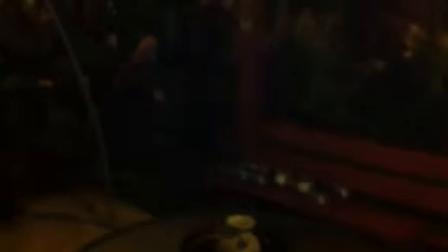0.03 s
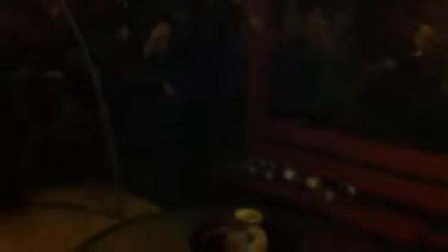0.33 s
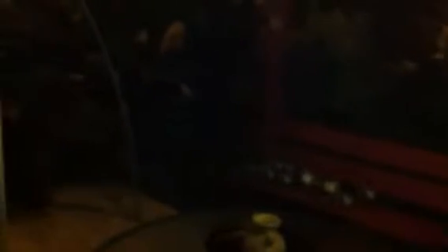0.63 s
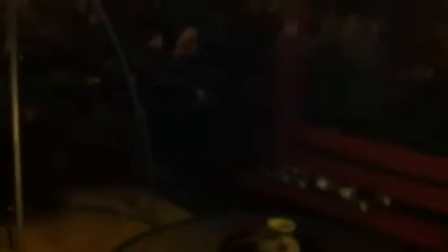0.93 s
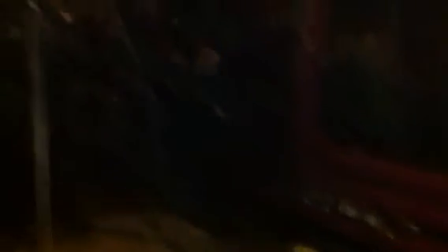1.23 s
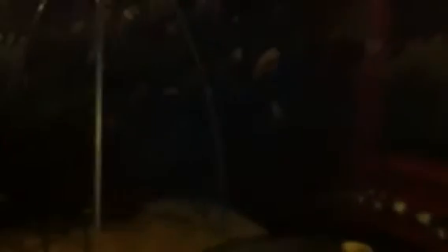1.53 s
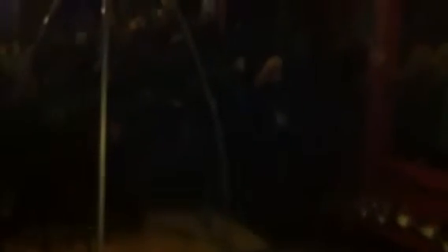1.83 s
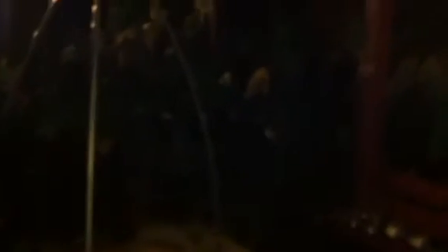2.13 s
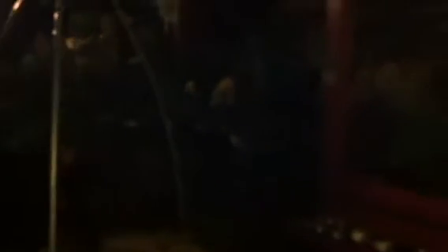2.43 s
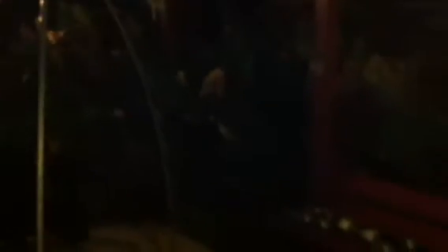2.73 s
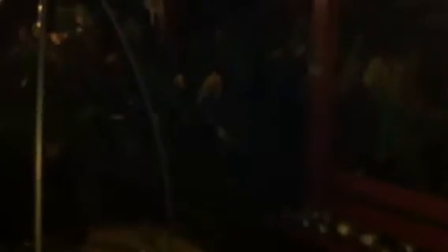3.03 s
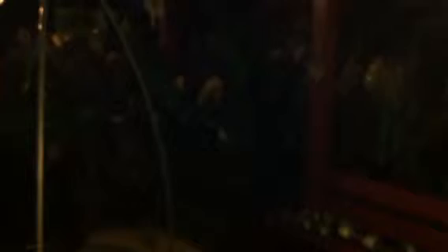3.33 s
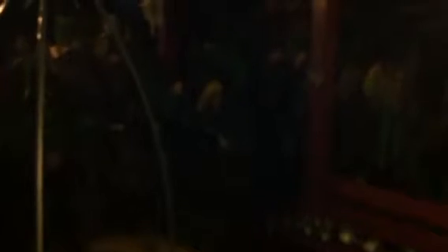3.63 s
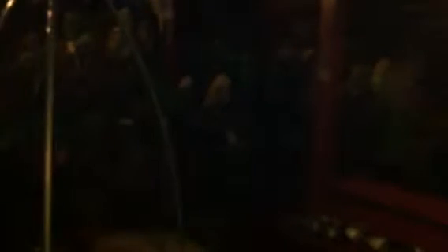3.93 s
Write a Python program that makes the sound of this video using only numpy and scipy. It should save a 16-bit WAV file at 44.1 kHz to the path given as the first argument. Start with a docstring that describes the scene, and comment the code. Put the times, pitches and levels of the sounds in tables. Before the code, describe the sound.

Distant frogs trade short whistled calls over hiss, then a near frog chirps quickly.

```python
"""Coqui frogs in a night garden

Over a steady rain-like hiss, far frogs answer one another with a low, mostly falling "co" and a
higher rising "qui", each a gliding tone radiated by the vocal sac and scattered by leaves and walls.
Late on a faint hum swells, and a near frog gives a sharp "co" and six quick "qui" notes,
reflected by the porch."""
import sys
import numpy as np
from scipy import signal
from scipy.fft import rfft, irfft
from scipy.io import wavfile
from scipy.ndimage import uniform_filter1d

SR = 44100
rng = np.random.default_rng(int(sys.argv[2]) if len(sys.argv) > 2 else 0)


def digitize_waveform(pressure):
    """Quantize a signal to 16-bit integers and store it at the path in sys.argv[1].

    Rows of a 2-D input are taken as channels; values are limited to [-1, 1].
    """
    field = np.atleast_2d(pressure).T
    bounded = np.clip(field, -1, 1)
    quanta = np.round(bounded * 32767).astype(np.int16)
    wavfile.write(sys.argv[1], SR, quanta)


N = 176400

# Relative spectral density of the hiss: frequency_hz, level_db
HISS_SPECTRUM = [(20, -20), (45, -36), (65, -28.5), (100, -18), (160, -3.5), (240, -1.5), (320, -2),
                 (500, -4), (680, 0), (1300, -0.5), (1800, -0.5), (2600, -1.95), (3200, -3), (3700, -6.5),
                 (5000, -6), (7500, -8), (11000, -7), (14500, -8), (15900, -14)]
# Slow swell of the hiss below the treble: time_s, gain_db
LOW_HISS_SWELL = [(0, -0.1), (1.5, 0.4), (2.2, 1), (3.2, 1.75), (4, 0.4)]
# Brief Gaussian surges of the treble hiss: centre_s, half_width_s, gain_db
TREBLE_SURGES = [(3.225, 0.005, 5.5), (3.538, 0.01, 2.2), (3.72, 0.034, 1)]
# Far "co" notes: start_s, length_s, source_level_db, pitch_hz, glide_fraction
FAR_CO_NOTES = [(.289, 0.031, -35.5, 2210, 0.005), (.456, 0.045, -34.5, 2060, -0.073),
                (0.842, 0.031, -40, 2050, -0.012), (1.158, 0.053, -38.5, 2247, -0.015),
                (1.542, 0.042, -32, 2078, -0.078), (1.914, 0.055, -42, 2222, -.02),
                (1.968, 0.035, -35, 1998, -0.024), (2.351, 0.064, -34, 2083, -0.073),
                (2.789, .04, -38.5, 2230, -0.016), (3.086, 0.064, -35, 2088, -0.067),
                (3.775, 0.043, -30.5, 2055, -0.081), (3.876, 0.052, -37.5, 2200, -0.029)]
# Far "qui" notes: start_s, length_s, source_level_db, pitch_hz, glide_fraction
FAR_QUI_NOTES = [(.217, 0.019, -36, 2970, 0.17), (.506, .03, -39, 3100, 0.048),
                 (0.554, 0.038, -36, 3040, 0.15), (.888, 0.025, -38.5, 3060, .11),
                 (1.549, 0.027, -37, 3100, 0.11), (1.599, 0.0385, -35, 3140, 0.061),
                 (1.647, 0.032, -34.5, 3035, 0.15), (2.059, .02, -36.5, 2980, .03),
                 (2.114, 0.029, -36, 3100, 0.12), (2.276, 0.021, -33.5, 2994, 0.026),
                 (2.385, 0.032, -36.5, 3073, 0.025), (2.452, 0.032, -32, 3026, 0.089),
                 (2.596, .04, -43, 3100, .02), (2.672, .03, -39, 3150, 0.088),
                 (2.718, 0.034, -38, 3020, .06), (3.838, 0.042, -35.5, 3086, 0.079),
                 (3.886, 0.0296, -36.5, 3130, 0.17)]
# Envelope of the hum: time_s, level_db
HUM_ENVELOPE = [(0, -71), (2.5, -64), (2.85, -56), (3.5, -57.5), (3.75, -53), (4, -56)]
# Near frog's notes: start_s, length_s, level_db, start_pitch_hz, end_pitch_hz
NEAR_CALL = [(3.0015, .02, -23.8, 2300, 2050), (3.0922, .0115, -19.3, 3080, 3150),
             (3.2060, .02, -25, 3050, 3300), (3.3212, .014, -24.5, 3050, 3280),
             (3.4362, .014, -24.6, 3050, 3280), (3.5443, .014, -26.5, 3050, 3270),
             (3.6485, .02, -29, 3040, 3300)]
# Early reflections from the porch: delay_s, gain_ratio
PORCH_REFLECTIONS = [(.0108, 0.45), (0.0164, .3), (0.0239, .25), (.0345, 0.21), (0.054, .15)]


def amp(db):
    """The decibel scale: 20 dB is a factor of ten in amplitude."""
    return 10 ** (np.asarray(db) / 20)


def unit_rms(x):
    """Normalisation to a mean power of 1."""
    return x / np.sqrt(np.mean(x ** 2) + 1e-20)


def drift(t, low_hz, high_hz):
    """Sinusoids of random phase sum to an irregular fluctuation of rms 1."""
    rates_hz = np.geomspace(low_hz, high_hz, num=30)
    return unit_rms(sum(np.sin(2 * np.pi * (hz * t + rng.random())) for hz in rates_hz))


def hiss():
    """Spectrally shaped noise: a rain-like wash whose low and treble bands flicker independently."""
    hop, crossover_hz, level_db = 256, 3540, -38.5
    frames = N // hop + 6
    t = np.arange(frames) * hop / SR
    hz = np.fft.rfftfreq(1024, 1 / SR)
    real, imag, patches = rng.standard_normal((3, frames, len(hz)))
    patches = uniform_filter1d(patches, size=10, axis=0)  # smooth in time
    patch_db = unit_rms(uniform_filter1d(patches, size=24, axis=1))  # and in frequency
    surge_db = sum(db * np.exp(-((t - centre) / width) ** 2) for centre, width, db in TREBLE_SURGES)
    treble_db = 0.75 * drift(t, 2.5, 35) + surge_db
    low_db = 0.73 * drift(t, 1.494, 20) + np.interp(t, *np.transpose(LOW_HISS_SWELL))
    treble_share = 1 / (1 + (crossover_hz / (hz + 1)) ** 8)
    gain = amp(patch_db + np.outer(treble_db, treble_share) + np.outer(low_db, 1 - treble_share))
    noise = signal.istft(((real + 1j * imag) * gain).T, nperseg=1024, noverlap=1024 - hop)[1][:N]
    knot_hz, knot_db = np.transpose(HISS_SPECTRUM)
    colour = amp(np.interp(np.log(np.fft.rfftfreq(N, 1 / SR) + 1), np.log(knot_hz), knot_db))
    return amp(level_db) * unit_rms(irfft(rfft(noise) * colour, N))


def add(mix, start_s, sound):
    """Linear superposition: a sound adds to the mix from its start time."""
    part = mix[max(round(start_s * SR), 0):][:len(sound)]
    part += sound[:len(part)]


def frog_note(length_s, from_hz, to_hz, bend, attack_s, release_s, flutter_depth):
    """Radiation from the vocal sac: a gliding tone with a slight amplitude flutter."""
    t = np.arange(0, length_s, 1 / SR)
    hz = from_hz + (to_hz - from_hz) * (t / length_s) ** bend
    gate = np.minimum(t / attack_s, 1) * np.minimum((length_s - t) / release_s, 1)
    flutter = 1 + flutter_depth * drift(t, low_hz=90, high_hz=280)
    return np.sin(np.pi / 2 * gate) * flutter * np.sin(2 * np.pi * np.cumsum(hz) / SR)


def scatter(sound, onset_s, t60_s=0.5, echoes_per_s=2000):
    """Diffuse reverberation: echoes from leaves and walls build up, then decay exponentially."""
    t = np.arange(SR) / SR
    echoes = rng.choice([-1., 1.], SR) * (rng.random(SR) < echoes_per_s / SR)
    tail = echoes * amp(-60 * t / t60_s) * np.minimum(t / onset_s, 1) ** 2
    return signal.fftconvolve(sound, tail / np.linalg.norm(tail))[:N]


def far_frogs():
    """Distant sources: the reverberant sound of each note slightly outweighs the direct sound."""
    co_shape = dict(bend=0.7, attack_s=0.0034, release_s=0.032)
    qui_shape = dict(bend=0.816, attack_s=0.0028, release_s=0.0068)
    direct_db, tail_db = -3, -2.5
    out = np.zeros(N)
    for notes, shape in [(FAR_CO_NOTES, co_shape), (FAR_QUI_NOTES, qui_shape)]:
        for start_s, length_s, level_db, pitch_hz, glide in notes:
            from_hz, to_hz = pitch_hz * (1 - glide / 2), pitch_hz * (1 + glide / 2)
            note = amp(level_db) * frog_note(length_s, from_hz, to_hz, **shape, flutter_depth=0.25)
            add(out, start_s, amp(direct_db) * note)
            add(out, start_s, amp(tail_db) * scatter(note, onset_s=0.0054))
    return out


def hum(pitch_hz=210.8, waver_depth=0.0041):
    """Slow frequency modulation makes a faint tone waver, like a distant motor."""
    t = np.arange(N) / SR
    hz = pitch_hz * (1 + waver_depth * drift(t, 0.493, 7.4))
    tone = unit_rms(np.sin(2 * np.pi * np.cumsum(hz) / SR))
    return amp(np.interp(t, *np.transpose(HUM_ENVELOPE))) * tone


def near_frog():
    """A close source: direct sound leads, then early reflections from the porch and a diffuse tail."""
    shape = dict(bend=0.8, attack_s=0.002, release_s=0.006)
    tail_db = -4.5
    out = np.zeros(N)
    for start_s, length_s, level_db, from_hz, to_hz in NEAR_CALL:
        note = amp(level_db) * frog_note(length_s, from_hz, to_hz, **shape, flutter_depth=0.3)
        add(out, start_s, note)
        for delay_s, gain in PORCH_REFLECTIONS:
            add(out, start_s + delay_s, gain * note)
        add(out, start_s, amp(tail_db) * scatter(note, onset_s=0.0087))
    return out


def scene():
    """Superposition of hiss, frogs and hum, the same in both ears."""
    mono = hiss() + near_frog() + far_frogs() + hum()
    return np.array([mono, mono])


def record(dry):
    """Band limiting: a linear-phase low-pass filter removes the highest treble."""
    cutoff_hz = 15900
    lowpass = signal.firwin(1023, cutoff_hz, window=("kaiser", 9), fs=SR)
    return signal.oaconvolve(dry, lowpass[None], "same")


dry = scene()
out = record(dry)
digitize_waveform(out)
```